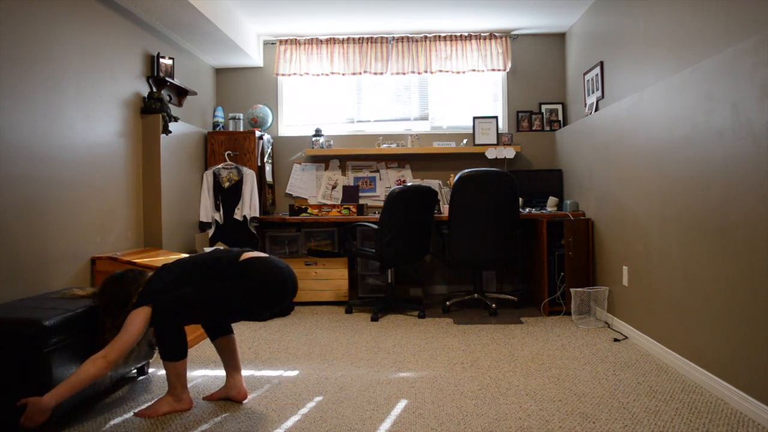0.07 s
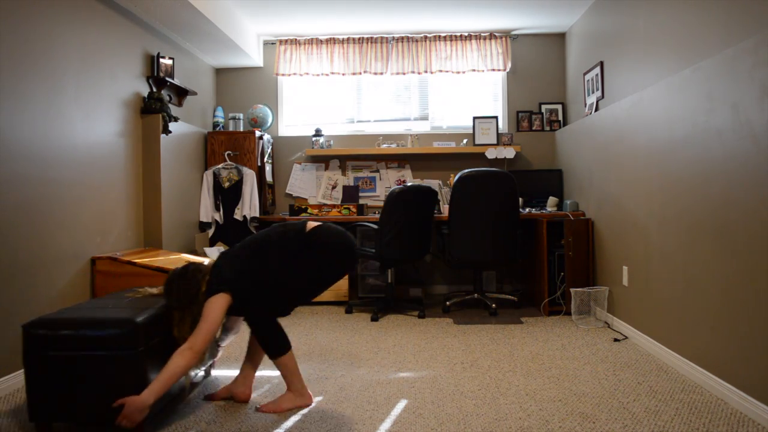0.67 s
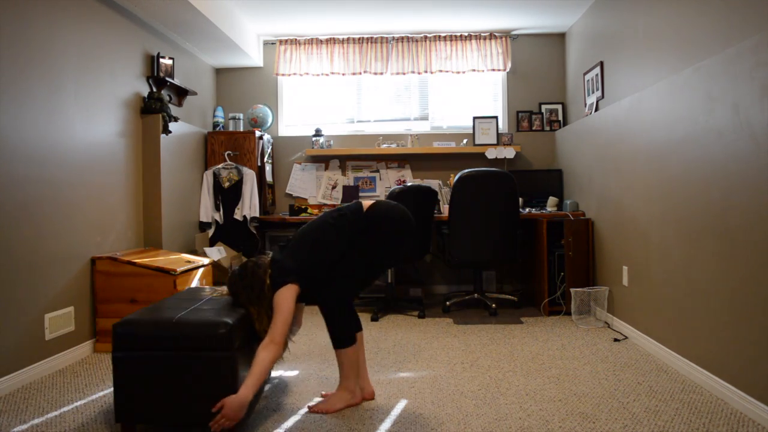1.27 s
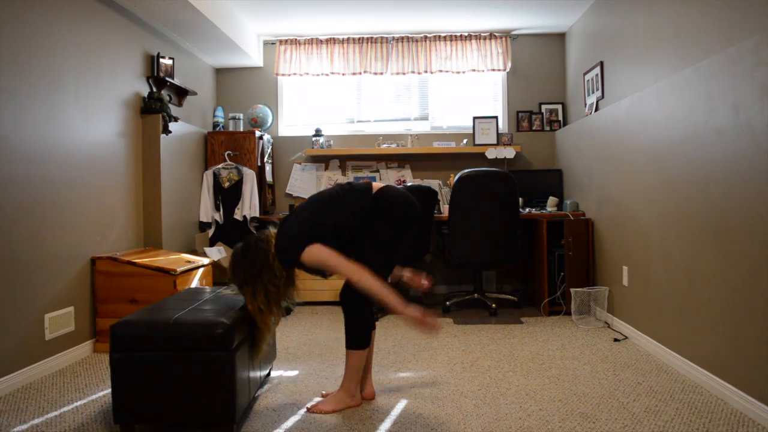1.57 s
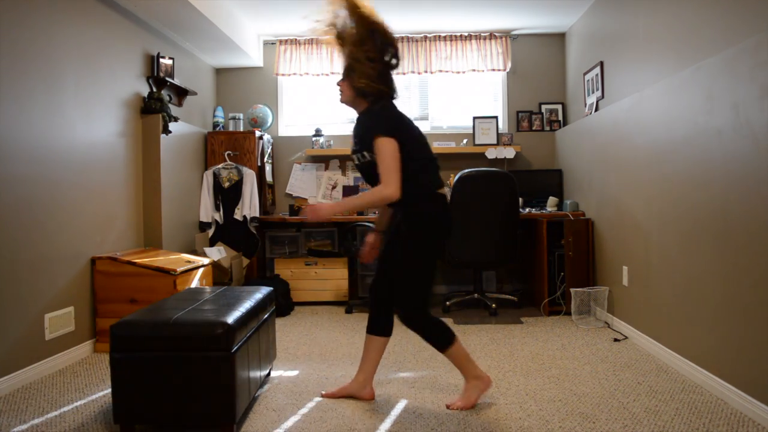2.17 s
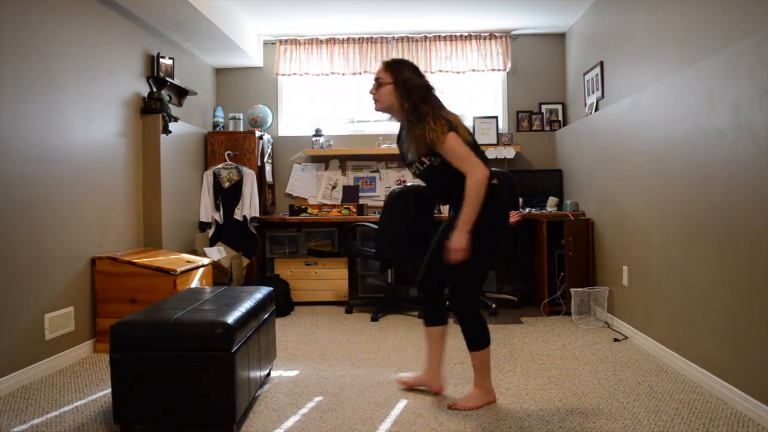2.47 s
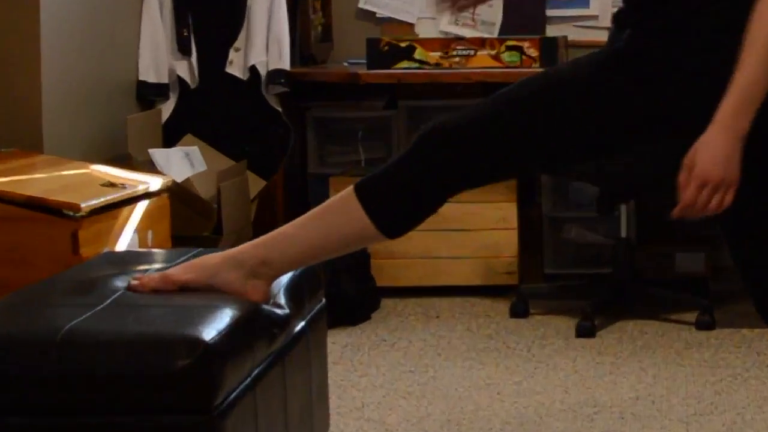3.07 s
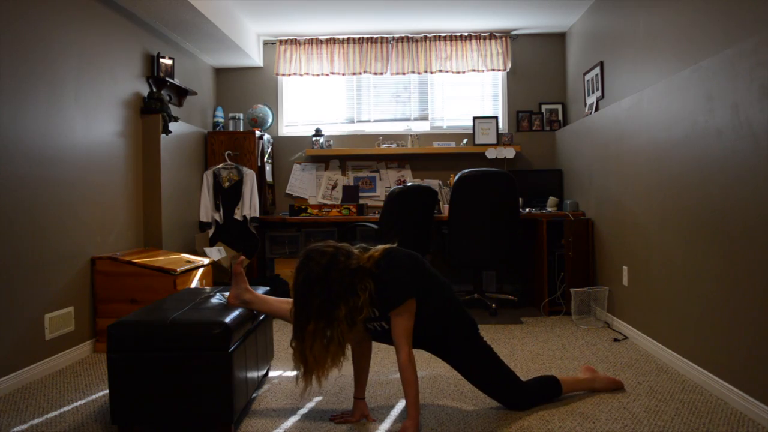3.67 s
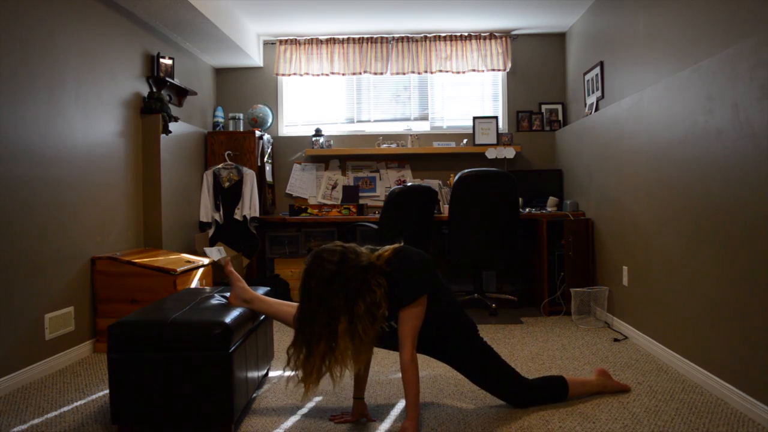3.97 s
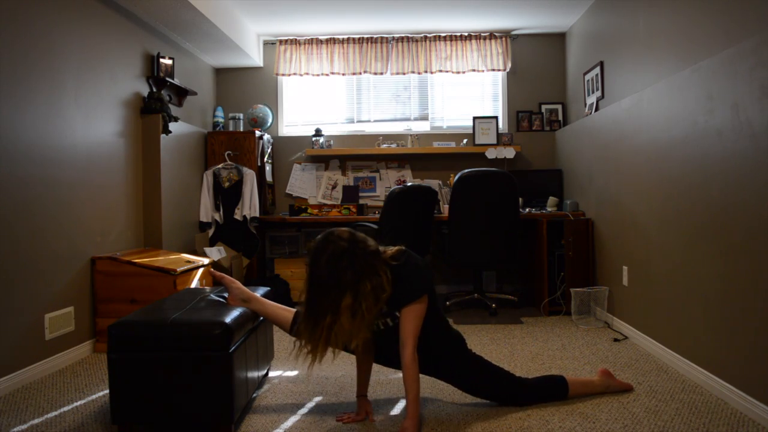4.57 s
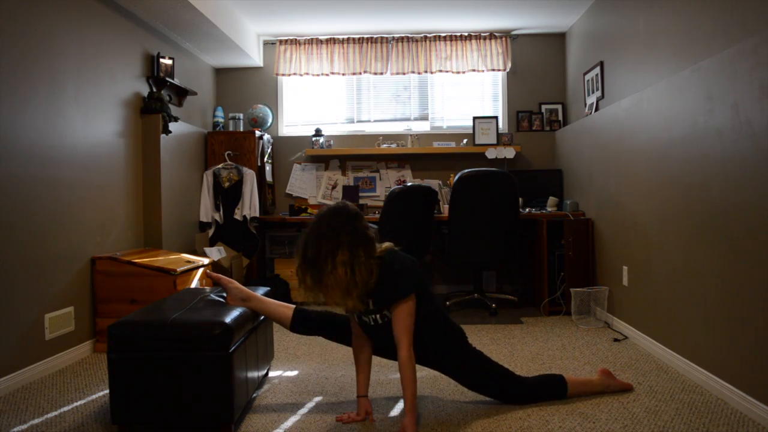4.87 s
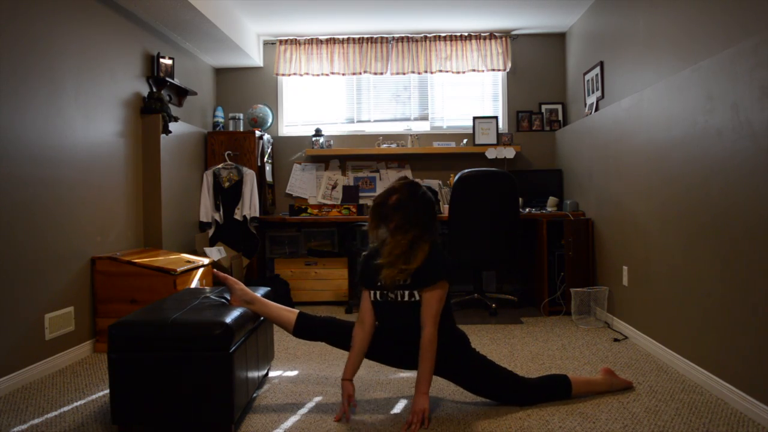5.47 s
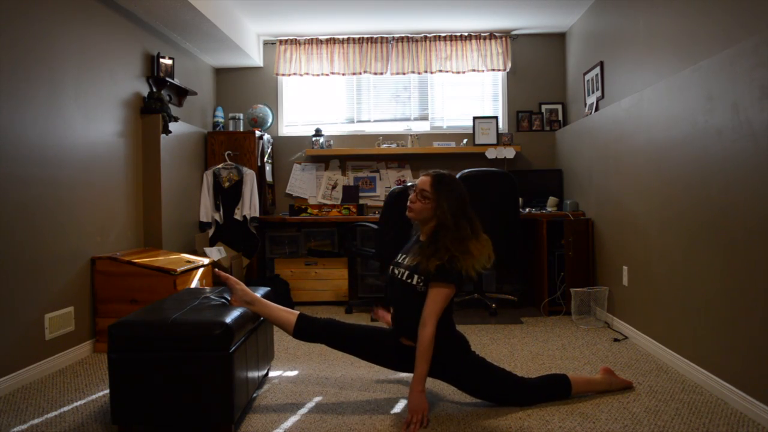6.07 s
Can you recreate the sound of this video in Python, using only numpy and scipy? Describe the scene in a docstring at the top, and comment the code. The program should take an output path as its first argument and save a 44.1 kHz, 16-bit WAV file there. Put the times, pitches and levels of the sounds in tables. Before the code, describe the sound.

A leather ottoman is dragged over carpet, juddering low while the pile hisses beneath it. A soft footfall, rustling clothes, a dry joint click and the brush of a bare sole follow. Then a heel lands on the lid with a loud slap and a ringing thud. Soft floor thumps and faint fabric swishes trail off. Everything sits centred in a small room with a low electrical hum.

```python
"""Ottoman drag and stretch

A barefoot person drags a leather ottoman over the carpet of a small room: its feet catch and slip,
so the box judders and the pile hisses. They step back, soles brushing the floor, a joint clicks,
and a heel swings onto the lid with a slap and a ringing thud. Then hands and knee settle softly
into a stretch while clothes rustle, all over a low mains hum."""
import sys
import numpy as np
from scipy import signal
from scipy.fft import rfft, irfft, next_fast_len
from scipy.io import wavfile
from scipy.ndimage import uniform_filter1d

SR = 44100
rng = np.random.default_rng(int(sys.argv[2]) if len(sys.argv) > 2 else 0)


def put_to_file(sound):
    """Save the sound as 16-bit audio at rate SR, in the file named by the first command-line argument."""
    columns = np.atleast_2d(sound).T  # one column per channel
    safe = np.clip(columns, -1, 1)
    whole_steps = np.round(safe * 32767)
    wavfile.write(sys.argv[1], SR, whole_steps.astype(np.int16))


N = 278403
TIME = np.arange(N) / SR


def from_db(db):
    """Decibels to gain."""
    return 10 ** (np.asarray(db) / 20)


def rms_one(x):
    """Scale to unit power."""
    return x / np.sqrt(np.mean(x ** 2) + 1e-20)


def at_hz(points, hz):
    """Read a curve on a log-frequency axis."""
    points = np.array(points)
    return np.interp(np.log(hz + 1e-3), np.log(points[:, 0]), points[:, 1])


def band(x, low_hz, high_hz, order):
    """Butterworth band-pass."""
    edges = [low_hz, min(high_hz, .45 * SR)]
    return signal.sosfilt(signal.butter(order, edges, "band", fs=SR, output="sos"), x)


def equalise(x, curve):
    """Minimum-phase EQ with a steep low cut under its first point; white noise keeps its power."""
    size = 2 * next_fast_len(len(x) // 2 + 4096)
    hz = np.arange(size // 2 + 1) * SR / size
    low_cut = np.clip(hz / curve[0][0], .1, 1) ** 3
    gain = rms_one(from_db(at_hz(curve, hz)) * low_cut)
    cepstrum = irfft(np.log(gain))[:size // 2]
    cepstrum[1:] *= 2
    return irfft(rfft(x, size) * np.exp(rfft(cepstrum, size)))[:len(x)]


def ring(force, modes):
    """A struck body: the force sets off one decaying sine per mode."""
    body = 0
    for hz, db, t60 in modes:
        r, w = from_db(-60 / (t60 * SR)), 2 * np.pi * hz / SR
        body += from_db(db) * signal.lfilter([0, np.sin(w)], [1, -2 * r * np.cos(w), r * r], force + 1e-18)
    return body


def resonate(x, hz, width_hz):
    """A resonance with unity gain at its peak."""
    r, w = np.exp(-np.pi * width_hz / SR), 2 * np.pi * hz / SR
    return signal.lfilter(np.array([1, 0, -1]) * (1 - r * r) / 2, [1, -2 * r * np.cos(w), r * r], x)


def push(start_s, db, contact_ms):
    """A half-sine of force: the longer the contact, the duller the hit."""
    phase = (TIME - start_s) * 1000 / contact_ms
    force = np.sin(np.pi * phase) * ((phase > 0) & (phase < 1))
    return from_db(db) * force / (force.sum() + 1e-9)


def decay(start_s, t60):
    """Envelope with an instant attack and an exponential tail."""
    return (TIME >= start_s) * from_db(-60 * np.clip((TIME - start_s) / t60, 0, 4))


def release_db(start_s, db_per_s):
    """Fader move in dB: flat until start_s, then falling for one second."""
    return -db_per_s * np.clip(TIME - start_s, 0, 1)


def swell(middle_s, length_s):
    """Bell envelope of a move, length_s wide at half height."""
    return .5 ** np.minimum((2 * (TIME - middle_s) / length_s) ** 2, 60)


def drift(per_s):
    """Random modulation at unit power, gliding to per_s new values a second."""
    knots = rng.standard_normal(int(per_s * N / SR) + 2)
    return rms_one(np.interp(TIME * per_s, np.arange(len(knots)), knots))


def grains(per_s, spread_db):
    """Random clicks of uneven size and sign, at unit power."""
    hits = rng.random(N) < per_s / SR
    sizes = from_db(spread_db * np.minimum(rng.exponential(1, N), 4))
    return rms_one(hits * sizes * rng.choice([-1, 1], N))


# Reverb time of the small room: (frequency [Hz], t60 [s])
ROOM_DECAY = [(100, .3), (450, .45), (1500, .35), (4500, .3), (9000, .21), (15000, .14)]
def room(x, predelay_s=0.0037):
    """Reverb return: diffuse wall reflections, each band dying at its own rate."""
    t = TIME[:SR // 2]
    edges, tail = np.geomspace(50, 18000, num=10), 0
    for low, high in zip(edges, edges[1:]):
        echoes = band(rng.standard_normal(len(t)), low, high, order=2)
        fade = from_db(-60 * t / at_hz(ROOM_DECAY, np.sqrt(low * high)))
        tail += rms_one(echoes * fade) * np.sqrt((high - low) * np.sum(fade ** 2))
    tail = np.concatenate([np.zeros(int(predelay_s * SR)), tail])
    return signal.fftconvolve(x, tail / np.linalg.norm(tail))[:N]


# Mains harmonics: (frequency [Hz], rms level [dB])
MAINS_HUM = [(60, -51.5), (120, -60.5), (180, -63), (240, -67.5), (300, -65.5)]
# Tone of still air and hiss: (frequency [Hz], relative level [dB])
AIR_EQ = [(40, -8), (75, -12), (107, -0.5), (150, -8), (190, -6), (300, -10.5), (450, -12.5), (650, -18),
          (1000, -19), (1900, -22), (4500, -25.5), (8000, -27), (15500, -27.5)]
def room_tone():
    """The bed: mains hum, a faint low drone and an even hiss."""
    hum = sum(from_db(db) * np.sqrt(2) * np.sin(2 * np.pi * (hz * TIME + rng.random()))
              for hz, db in MAINS_HUM)
    drone = resonate(rng.standard_normal(N), hz=96, width_hz=28)
    drone = rms_one(resonate(drone, hz=96, width_hz=29))
    air = rms_one(equalise(rng.standard_normal(N), AIR_EQ))
    return hum + from_db(-57) * drone + from_db(-47.5) * air


# Tone of the hiss at the sides: (frequency [Hz], relative level [dB])
SIDE_EQ = [(20, -6), (300, 1.5), (1500, -2.5), (6000, -1), (15000, 0.5)]
def side_hiss():
    """Faint noise that gives the bed its stereo width."""
    return from_db(-57) * rms_one(equalise(rng.standard_normal(N), SIDE_EQ))


# Swishes of clothes and hair: (middle [s], length [s], level [dB])
RUSTLE_CUES = [(1.56, 0.29, -52.5), (1.772, 0.12, -45), (1.918, 0.11, -45), (2.287, 0.24, -54),
               (3.785, 0.064, -51), (3.912, .14, -53), (4.047, 0.072, -48), (4.372, 0.14, -51.5),
               (5.022, .08, -45.5), (5.112, 0.08, -49), (5.21, 0.046, -55), (5.34, 0.13, -52.5),
               (6.305, 0.011, -44.5)]
# Tone of the fabric: (frequency [Hz], relative level [dB])
CLOTH_EQ = [(200, -6), (450, -1), (1000, -3), (1400, -6), (2100, -3), (3100, -11), (4300, -7.5),
            (6500, -18), (14000, -28)]
def clothes():
    """Fabric rubs in small uneven clumps with each move."""
    rubs = grains(per_s=7000, spread_db=3.5) * from_db(1.1 * drift(per_s=70))
    threads = equalise(rubs, CLOTH_EQ)
    threads = rms_one(threads + from_db(-11) * room(threads))
    return sum(from_db(db) * swell(middle, length) for middle, length, db in RUSTLE_CUES) * threads


# Brushes of a bare sole on carpet: (time [s], attack [s], hold [s], level [dB])
BRUSH_CUES = [(0.426, 0.05, 0.14, -35.5), (1.207, 0.041, .04, -34), (2.358, 0.036, 0.083, -36),
              (3.364, 0.0085, 0.011, -36.5)]
# Tone of skin on pile: (frequency [Hz], relative level [dB])
SOLE_EQ = [(400, -0.5), (850, -9.5), (1300, -5.5), (1550, -2), (1800, -2), (2250, -0.5), (3200, -8),
           (4300, -4.5), (5200, -9.5), (7000, -16.5), (10500, -21), (15000, -29)]
def soles():
    """A sole presses down, sweeps over the pile flicking thousands of fibres, and lifts off."""
    fibres = equalise(grains(per_s=12000, spread_db=4), SOLE_EQ)
    fibres = rms_one(fibres + from_db(-9) * room(fibres))
    strokes = 0
    for start, attack, hold, db in BRUSH_CUES:
        press = np.clip((TIME - start) / attack, 0, 1)
        strokes += press * from_db(db + release_db(start + attack + hold, db_per_s=205))
    return strokes * fibres


# Landings of feet, hands and knee: (time [s], force level [dB], contact [ms])
LANDING_CUES = [(1.484, -22.5, 1.57), (3.4604, -23.5, 3.2), (3.7807, -28, 2.1), (3.948, -34, 2.2),
                (4.411, -41.5, 0.53), (5.068, -37.5, 0.51), (5.29, -40.5, 0.44), (6.227, -24, 3),
                (6.295, -43, 0.93)]
# Dull ring of the floor: (frequency [Hz], gain [dB], t60 [s])
FLOOR_RING = [(172, -16, 0.058), (217.3, -6.5, 0.1), (301, -2, 0.043), (367, -11, 0.098),
              (465, -3.5, 0.034), (710, -2, 0.03)]
def soft_landings():
    """Soft weight thumps on the carpeted floor; much of it arrives by way of the walls."""
    force = sum(push(*cue) for cue in LANDING_CUES)
    thump = band(ring(force, FLOOR_RING), low_hz=151, high_hz=1500, order=2)
    return thump + from_db(-8.5) * room(thump)


# Click of a joint: (time [s], force level [dB])
JOINT_CUES = [(2.1672, -15.5)]
# Tone of the snap: (frequency [Hz], relative level [dB])
SNAP_EQ = [(1000, -34), (2000, -8), (3200, 0), (5000, -3), (8000, -4), (15000, -6)]
def joint_click():
    """A joint gives one dry snap and the walls answer."""
    force = sum(push(start, db, contact_ms=.05) for start, db in JOINT_CUES)
    snap = equalise(force, SNAP_EQ)
    walls = room(band(snap, low_hz=900, high_hz=6000, order=1), predelay_s=.001)
    return from_db(8) * (snap + walls)


# Speed of the ottoman over two shoves, drawn as friction: (time [s], level [dB])
SHOVE_CURVE = [(0.0, -67), (0.028, -61.5), (0.142, -40.5), (0.396, -31.5), (0.616, -33), (0.668, -34.5),
               (0.914, -27), (0.924, -27.5), (1.056, -34.5), (1.19, -36.5)]
def drag_speed_db():
    """Speed in dB relative to cruising: two shoves, a short glide, a stop."""
    times, levels = np.transpose(SHOVE_CURVE)
    cruise_db = -32
    return np.interp(TIME, times, levels) - cruise_db + release_db(start_s=1.298, db_per_s=129)


def shake(slips, modes, low_hz, high_hz):
    """Slips excite resonances of alternating polarity; a leveller holds their sum steady."""
    body = sum((-1) ** k * from_db(db) * resonate(slips, hz, width)
               for k, (hz, width, db) in enumerate(modes))
    body = band(body, low_hz, high_hz, order=4)
    power = np.abs(uniform_filter1d(body * body, size=2000))
    return body / np.sqrt(power + 1e-12)


# Resonances of the sliding box and of its panels: (frequency [Hz], width [Hz], relative level [dB])
BOX_MODES = [(47.3, 4.6, -12), (79, 19.7, -2.5), (93.7, 14.7, 2), (114.6, 14.6, -6), (126, 9.3, -10)]
PANEL_MODES = [(148.5, 12.6, 1.5), (198.6, 22.8, 1), (241, 20.7, -5)]
# Tone of the pile under the box: (frequency [Hz], relative level [dB])
PILE_EQ = [(250, -1), (350, 1), (450, -4.5), (530, -2.5), (700, -8.5), (1000, -10), (1300, -10.5),
           (1550, -11.5), (2200, -12.5), (3100, -17), (4300, -17.5), (5500, -22.5), (7500, -28.5),
           (11500, -34), (15500, -43)]
# The feet catch and the box lurches: (middle [s], length [s], judder level [dB], drumming level [dB])
LURCH_CUES = [(0.21, 0.066, -30, -32), (0.423, 0.27, -18, -18.5), (0.76, 0.085, -14.5, -20.5),
              (1.026, 0.073, -25, -17.5), (1.167, 0.11, -23.5, -31)]
def ottoman_drag():
    """Its feet catch and slip on the carpet loops: the box judders, panels drum, fibres hiss."""
    slips = grains(per_s=420, spread_db=3.5)
    judder = shake(slips, BOX_MODES, low_hz=42, high_hz=149)
    drumming = shake(slips, PANEL_MODES, low_hz=131.5, high_hz=273)
    # each swing of the box presses the feet harder into the pile
    flicks = grains(per_s=14000, spread_db=2.5) * from_db(0.83 * judder + drift(per_s=45.15))
    fibres = equalise(flicks, PILE_EQ)
    fibres = rms_one(fibres + from_db(-12.5) * room(fibres))
    # all three layers ride the speed; the panels also calm down as the drag goes on
    speed_db, calm_db_per_s = drag_speed_db(), 10
    box_gain = from_db(-21 + 1.45 * speed_db)
    panel_gain = from_db(-17.5 + 1.07 * speed_db - calm_db_per_s * TIME)
    pile_gain = from_db(-28.5 + 0.94 * speed_db)
    # lurches add their power to the box and its panels
    box_lurch = sum(from_db(db) * swell(middle, length) for middle, length, db, _ in LURCH_CUES)
    panel_lurch = sum(from_db(db) * swell(middle, length) for middle, length, _, db in LURCH_CUES)
    body = np.hypot(box_gain, box_lurch) * judder + np.hypot(panel_gain, panel_lurch) * drumming
    return body + pile_gain * fibres


# Hits on the ottoman: (time [s], thud drive [dB], slap drive [dB], contact [ms])
HEEL_CUES = [(2.921, -14, -12, 4.6), (2.9331, -6.5, 3.5, 0.69), (2.9638, 1, -45, 7.4)]
# Ring of the struck ottoman: (frequency [Hz], gain [dB], t60 [s])
OTTOMAN_RING = [(49, -25.5, 0.59), (97.8, -12, 0.17), (179, -21, 0.41), (215.4, -13, 0.61),
                (233, -6.5, 0.12), (230.3, -12, 0.62), (297, -22, 0.73), (338, -30.5, 1), (464, -34, 0.94),
                (700, -16, 0.034), (890, -4.5, 0.047), (1140, -13, 0.089)]
# Tone of skin on leather: (frequency [Hz], relative level [dB])
SLAP_EQ = [(200, 22), (700, 1), (1200, 0.5), (1800, -3), (2800, -6), (4100, -2.5), (5800, -12.5),
           (7800, -8.5), (11500, -15), (15500, -20)]
def heel_on_lid():
    """The foot touches the lid, lands with a slap, and its weight rocks the box on the floor."""
    force = sum(push(start, db, contact_ms) for start, db, _, contact_ms in HEEL_CUES)
    thud = band(-ring(force, OTTOMAN_RING), low_hz=46.4, high_hz=3000, order=3)
    thud *= from_db(release_db(start_s=3.12, db_per_s=170))  # the foot settles and damps the ring
    # skin meets leather over a few milliseconds
    contact = sum(from_db(db) * (decay(start, t60=0.018) + from_db(-20.5) * decay(start, t60=0.085))
                  for start, _, db, _ in HEEL_CUES)
    slap = equalise(contact * rng.standard_normal(N), SLAP_EQ)
    # a sharp crack feeds the reverb; carpet and furniture soak up its treble
    crack = sum(push(start, db, contact_ms=0.024) for start, _, db, _ in HEEL_CUES)
    walls = room(band(equalise(crack, SLAP_EQ), low_hz=320, high_hz=4800, order=1))
    return thud + from_db(-7) * slap + from_db(9.5) * walls


def scene():
    """The mix: everything sits in the centre, with only a little hiss at the sides."""
    ottoman = ottoman_drag() + heel_on_lid()
    person = soft_landings() + joint_click() + soles() + clothes()
    centre = ottoman + person + room_tone()
    side = side_hiss()
    return np.array([centre + side, centre - side])


def record(dry):
    """Master chain: clip at full scale, then cut the top steeply."""
    cutoff_hz = 15750
    low_pass = signal.ellip(10, .1, 70, cutoff_hz, fs=SR, output="sos")
    return signal.sosfilt(low_pass, np.clip(dry, -1, 1))


dry = scene()
out = record(dry)
put_to_file(out)
```